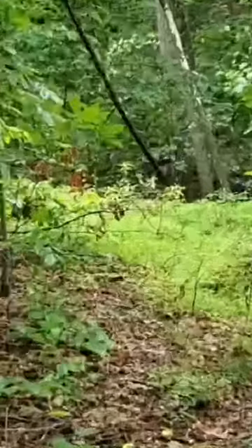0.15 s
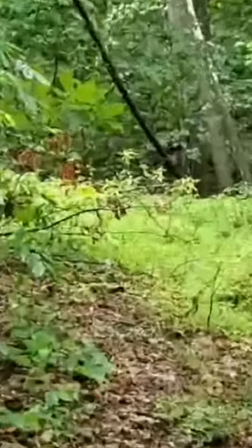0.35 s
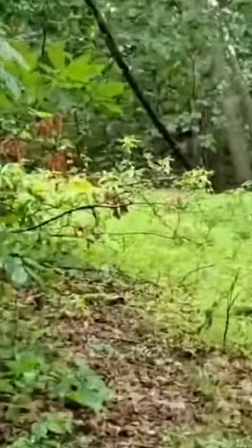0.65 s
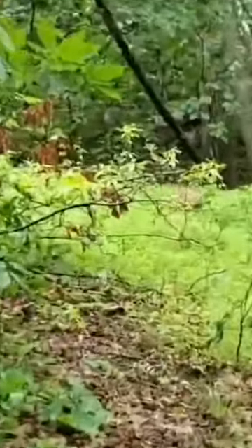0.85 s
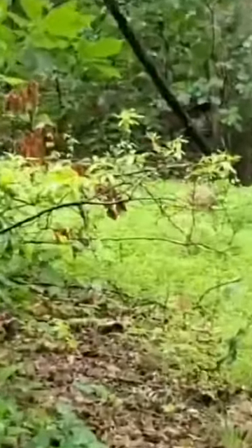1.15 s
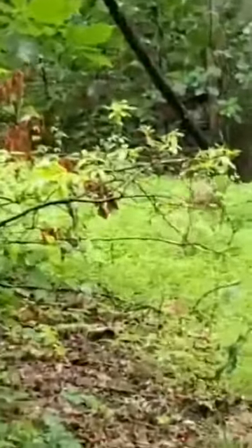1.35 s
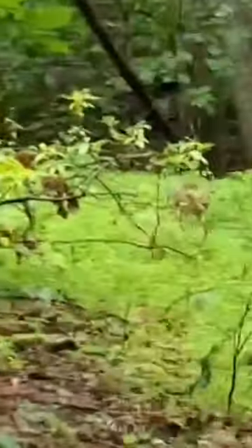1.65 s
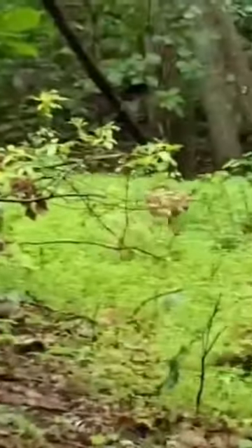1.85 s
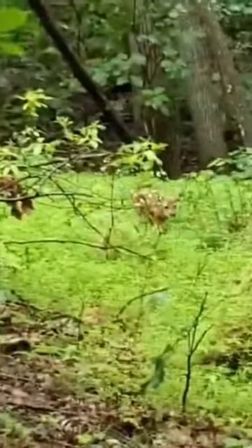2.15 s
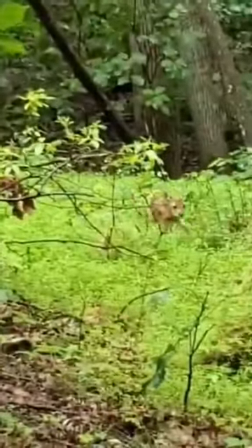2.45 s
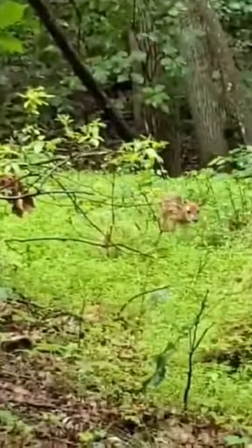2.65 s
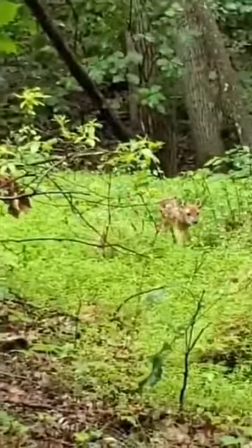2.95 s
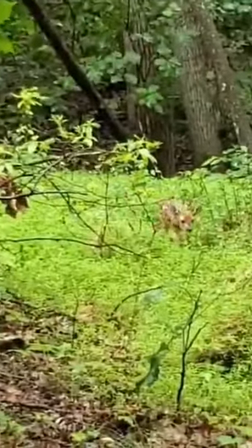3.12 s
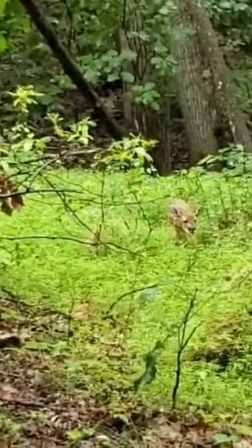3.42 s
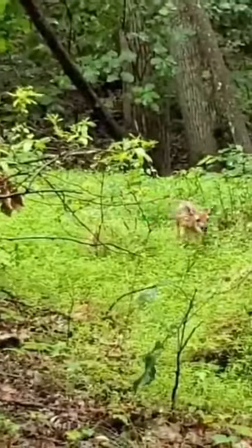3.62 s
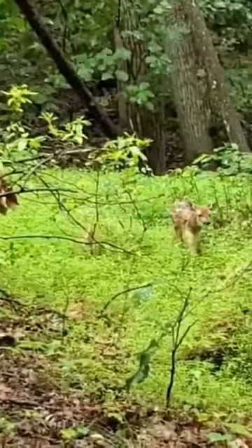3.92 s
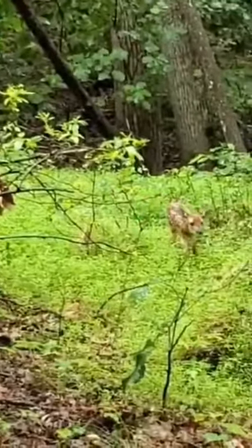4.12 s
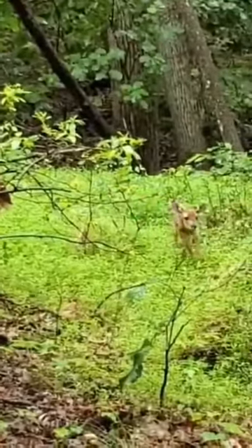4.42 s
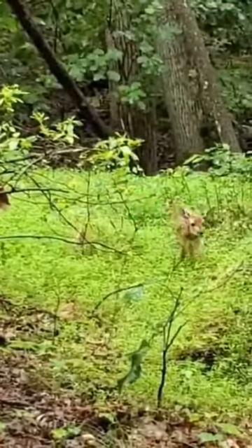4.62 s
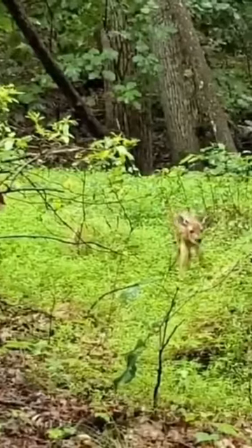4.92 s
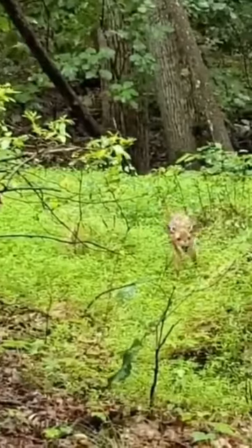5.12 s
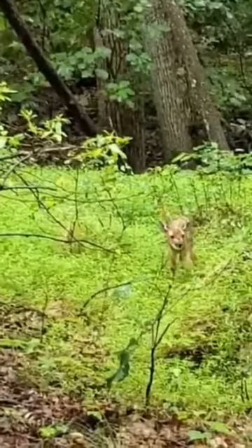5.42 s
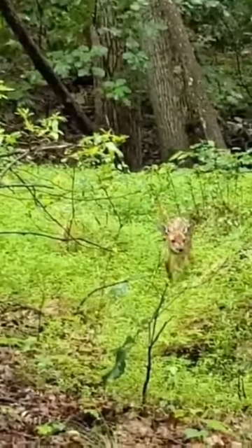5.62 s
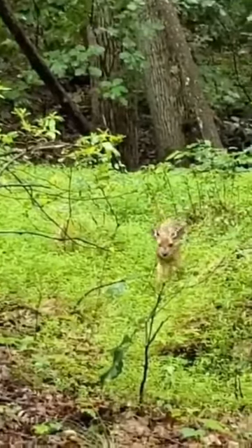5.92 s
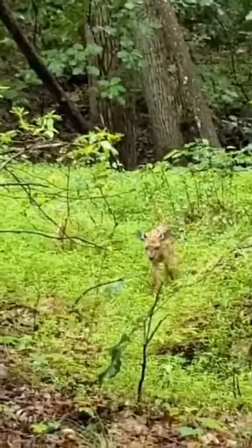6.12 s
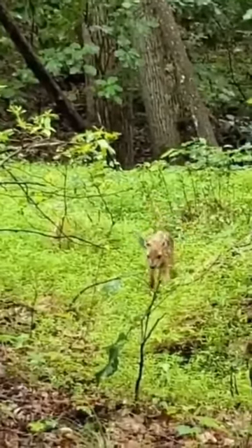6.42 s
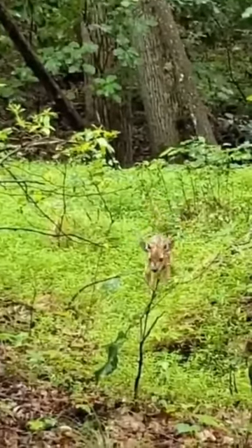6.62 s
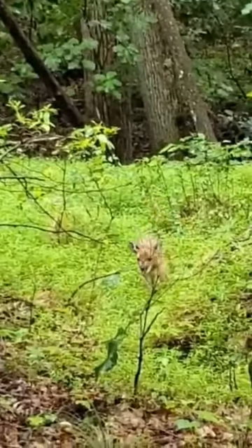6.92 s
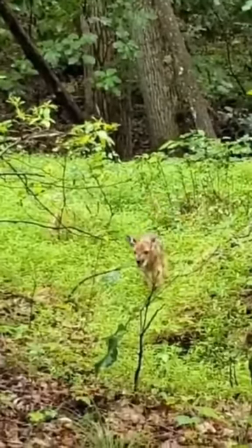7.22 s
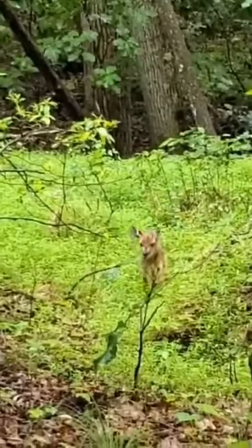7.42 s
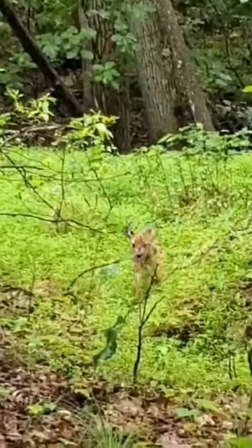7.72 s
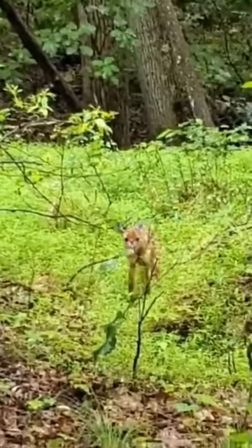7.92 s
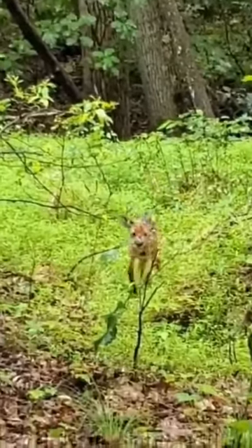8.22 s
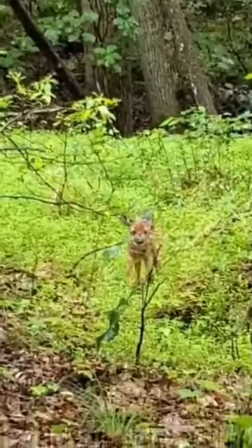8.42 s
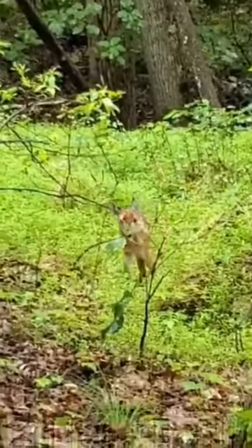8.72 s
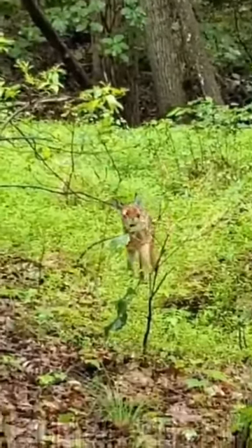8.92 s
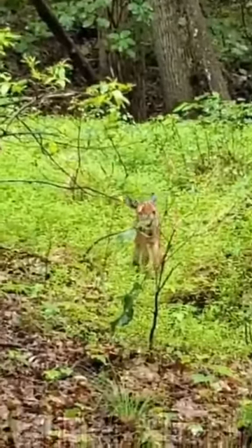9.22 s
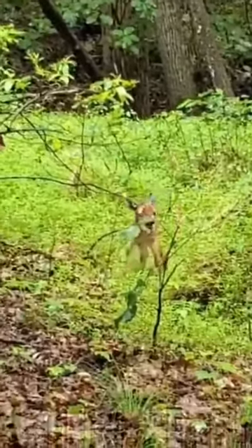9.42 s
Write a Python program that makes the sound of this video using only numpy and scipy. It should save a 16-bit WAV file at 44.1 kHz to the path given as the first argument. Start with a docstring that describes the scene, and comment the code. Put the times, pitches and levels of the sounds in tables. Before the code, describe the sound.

Harsh, high fawn bleats repeat every couple of seconds among echoing trees, with faint leaf crackles, hand bumps and steady hiss.

```python
"""Fawn calling in a wood

A fawn gives five nasal bleats, the last the strongest. Each is a train of sharp pulses from the vocal folds,
bent into an arch of pitch and rung by throat, nose and mouth. Trunks and leaves scatter it into a haze and a tail.
Crackles and rustles of dry leaves, rumble and bumps of the hand-held microphone and the hiss of foliage
are shaped noise; a far bird is a gliding tone. A compressor holds the bleats down."""
import sys
import numpy as np
from scipy import signal
from scipy.fft import rfft, irfft
from scipy.io import wavfile
from scipy.ndimage import uniform_filter1d

SR = 44100
rng = np.random.default_rng(int(sys.argv[2]) if len(sys.argv) > 2 else 0)


def digitize_waveform(pressure):
    """Quantize a signal to 16-bit integers and store it at the path in sys.argv[1].

    Rows of a 2-D input are taken as channels; values are limited to [-1, 1].
    """
    field = np.atleast_2d(pressure).T
    bounded = np.clip(field, -1, 1)
    quanta = np.round(bounded * 32767).astype(np.int16)
    wavfile.write(sys.argv[1], SR, quanta)


N = 421596
EDGE_HZ = 13150  # upper limit of the whole sound

# The bleats. Each row: start in seconds, length in seconds, effort in relative dB, ceiling of the pitch in Hz,
# scoop time in seconds, crest time in seconds, sag in Hz, last drop in Hz, fade in dB,
# nose level in relative dB, mouth level in relative dB, throat tuning as a ratio.
BLEAT_CALLS = [ (1.46, 0.47, -13, 571.4, 0.051, .184, 128, 248.3, -13, 2, -6, 1.02),
               (3.225, 0.47, -12.5, 566.2, 0.04, 0.22, 133, 273, -11, -0.5, -6.5, 1.025),
               (4.984, 0.48, -13, 561.3, .040, 0.17, 216, 194.2, -15.5, -3.5, -6, 1.03),
               (6.762, .555, -13, 558.3, .044, .182, 161, 75.2, -11, -3, -9, 1.012),
               (9.209, 0.57, -6.5, 567.6, .033, 0.21, 184, 80, -29, -2.5, -6, 1.028), ]
# Upper resonances of the throat. Each row: Hz before tuning, width in Hz, relative level in dB.
THROAT_RINGS = [(2975, 520, 0.5), (4156, 890, -1), (4890, 250, -1.5), (5525, 1130, -1.5), (6410, 940, -7.5),
                (10070, 10700, -26.5), (12100, 1800, -17)]
# Low resonances of the mouth. Each row: Hz, width in Hz, relative level in dB.
MOUTH_RINGS = [(560, 540, -46), (1487, 374, 7.5), (2300, 1100, 6)]
# Scatter from near trunks and leaves. Each row: Hz, level in dB against the direct sound.
NEAR_SCATTER = [(500, 1), (1600, -7), (2600, -12.5), (3600, 7), (6000, -1), (13000, 2.5)]
# Tail of the deep wood. Each row: Hz, level in dB against the direct sound.
WOOD_TAIL = [(500, 8.5), (1600, -16), (3300, -12), (4500, -9), (6000, -14.5), (13000, -16)]
# How long that tail lasts. Each row: Hz, time in seconds to die by 60 dB.
WOOD_TAIL_T60 = [(1000, 1.3), (3300, 1.094), (7000, 0.76), (13000, 0.89)]
# Left-right balance of the fawn. Each row: Hz, left minus right in dB.
PORT_BALANCE = [(1200, 1.5), (2500, -6), (4500, 5), (13000, 4.5)]
# The fawn reaches the left port first. Each row: Hz, lead in radians.
LEFT_LEAD = [(1500, 0), (2800, 1.8), (4050, 3), (7400, 5.5), (13000, 9.3)]
# Dry leaves and twigs crackling underfoot.
# Each row: time in seconds, relative peak in dB, centre in Hz, left minus right in dB.
LEAF_CRACKLES = [(0.756, -42, 2290, -3), (1.093, -36, 4540, 3), (1.224, -37.5, 3000, -2),
                 (1.306, -35.5, 3780, 1), (1.334, -31.5, 2430, 0), (1.416, -35, 3940, 3),
                 (3.222, -32.5, 2450, -2), (4.364, -38.5, 2340, 5), (4.404, -41, 3820, 2),
                 (4.459, -40, 5000, 3), (4.558, -37.5, 5100, 4), (4.655, -41, 2630, 9),
                 (5.828, -37, 2180, 0), (6.11, -41, 3500, 0), (6.146, -40.5, 856, 2), (6.563, -39, 2520, 1),
                 (6.707, -37.5, 2570, 0), (8.895, -33.5, 2280, 1), (8.942, -38.5, 2740, 3),
                 (8.956, -42, 2760, 12), (9.016, -41, 3770, 4), (9.086, -41.5, 2360, 5)]
# How busily the leaf litter rustles. Each row: time in seconds, relative level in dB.
LITTER_RUSTLE = [(0, -59), (.8, -50.5), (2.2, -52.5), (3.1, -61), (5.8, -111), (6.4, -57), (7.8, -60),
                 (8.7, -84), (9.1, -59)]
# Colour of the microphone rumble. Each row: Hz, relative density in dB per Hz.
RUMBLE_COLOUR = [(15, -30), (35, -3), (60, 7), (85, -4), (125, -14), (200, -23), (400, -23), (900, -67)]
# Rise and fall of the rumble. Each row: time in seconds, relative level in dB.
RUMBLE_COURSE = [(0, -72), (1.1, -67.5), (1.45, -54), (1.85, -49.5), (2.1, -62), (2.5, -56.5), (2.85, -69),
                 (3.35, -61.5), (3.65, -42), (3.9, -57), (4.2, -47.5), (4.9, -68), (5.35, -50), (5.9, -77),
                 (6.3, -58.5), (7.1, -56), (7.9, -65.5), (9.56, -64)]
# Bumps of the hand. Each row: time in seconds, swing in relative dB, dull knock in relative dB.
HAND_BUMPS = [(0.092, -57, -76), (1.544, -33.5, -47), (1.754, -39, -45), (1.809, -59, -40),
              (2.085, -63, -70), (2.22, -48, -70), (3.469, -51, -51), (3.768, -49, -48.5), (3.99, -37, -64),
              (4.171, -32.5, -59), (4.221, -32, -68), (5.381, -56, -63), (6.309, -40.5, -72),
              (6.841, -46, -53), (8.1, -44.5, -68), (8.86, -45, -72), (9.066, -33, -68)]
# A far bird's whistle. Each row: time in seconds, pitch in Hz, relative level in dB.
BIRD_WHISTLE = [(7.56, 2200, -50), (7.62, 2293, -62), (7.669, 2390, -47), (7.709, 2376, -69)]
# Colour of the foliage hiss. Each row: Hz, relative density in dB per Hz.
LEAF_COLOUR = [(76, -36), (130, -7), (207, -13), (355, -9), (423, -11), (750, -5), (1400, -6), (2460, -1),
               (2870, -3), (6460, -9), (8300, -19.5), (12200, -24), (13200, -28)]
# Rise and fall of the hiss. Each row: time in seconds, relative level in dB.
LEAF_COURSE = [(0, -10.2), (.5, -4), (1.2, 0), (2.7, -1.94), (4.4, -2.2), (6.2, -2.65), (8.1, -5.5),
               (9.56, -2)]
# How alike the hiss is on left and right. Each row: Hz, likeness from 0 to 1.
LEAF_LIKENESS = [(60, 0.67), (180, 0.94), (520, 0.52), (1530, 0.6), (4520, 0.15), (13300, 0.12)]


def fawn(earlier_start_s=-0.5, earlier_db=3):
    """All the bleats, scattered by the wood and heard a little differently by the two ports."""
    # a second of lead-in holds an earlier bleat, like the third, whose echoes hang on at the opening
    voice = np.zeros(SR + N)
    for start, *shape in BLEAT_CALLS:
        add(voice, 1 + start, bleat(*shape))
    add(voice, 1 + earlier_start_s, gain_of(earlier_db) * bleat(*BLEAT_CALLS[2][1:]))
    hz, _, z = signal.stft(wood(voice), SR, nperseg=512)
    # each port takes half of the level and phase difference
    lean_db = read(PORT_BALANCE, hz)[:, None] / 2
    lead = read(LEFT_LEAD, hz)[:, None] / 2
    z = z * np.exp(1j * np.array([lead, -lead]))
    z = z * gain_of(np.array([lean_db, -lean_db]))
    return signal.istft(z, SR, nperseg=512)[1][:, SR:SR + N]


def bleat(length, effort_db, top_hz, scoop_s, crest_s, sag_hz, drop_hz, fade_db, nose_db, mouth_db, tuning):
    """Air pulses from the vocal folds ring throat, nose and mouth; effort alone sets how loud they are."""
    t = np.arange(0, length, 1 / SR)
    hz = arch(t, length, top_hz, scoop_s, crest_s, sag_hz, drop_hz)
    drive = vocal_folds(hz)
    # the mouth grows as it opens, while the nose wavers
    late = t / length - .5
    nasal_db = nose_db - 0.5 * late + 6 * wander(len(t), 5.6)
    nose = gain_of(nasal_db) * evened(cavity(drive, [(3359, 483, 0)]))  # one narrow ring: Hz, width in Hz, dB
    mouth = gain_of(mouth_db + 8 * late) * evened(cavity(drive, MOUTH_RINGS))
    tuned_rings = [(f * tuning, width, db) for f, width, db in THROAT_RINGS]
    voice = evened(cavity(drive, tuned_rings)) + nose + mouth
    # level the voice out, so that only effort shapes its loudness
    power = uniform_filter1d(uniform_filter1d(voice ** 2, size=900), size=700)
    steady = voice / np.sqrt(power + 1e-9)
    return gain_of(effort_db + effort(t, length, fade_db)) * steady * signal.windows.tukey(len(t), .025)


def vocal_folds(hz):
    """Sharp pulses, clean when the folds are taut, uneven in time and strength when they are slack."""
    slack_hz, jitter, shimmer_db = 490, .04, 4.5  # the folds slacken below this pitch
    small_head_hz = 1100  # so small a head radiates little below this
    slack = np.clip(2 * (1 - hz / slack_hz), 0, 1)
    turns = np.cumsum(hz * (1 + jitter * slack * wander(len(hz), 163))) / SR
    # many cosines in step add up to one sharp pulse per turn; each fades out at the upper limit
    folds = np.zeros(len(hz))
    for k in np.arange(1, EDGE_HZ // 220):
        folds += np.cos(2 * np.pi * k * turns) * np.clip((EDGE_HZ - k * hz) / hz + 1, 0, 1)
    # one random strength per cycle
    strength = rng.standard_normal(SR // 100)[np.round(turns).astype(int)]
    shimmer = gain_of(shimmer_db * slack * strength)
    thin = signal.butter(2, small_head_hz, "high", fs=SR, output="sos")
    return signal.sosfilt(thin, evened(folds * np.sqrt(hz)) * shimmer)


def arch(t, length, top_hz, scoop_s, crest_s, sag_hz, drop_hz):
    """The folds tighten in a quick scoop, settle on a crest, sag as air runs out and let go at the end."""
    scoop_hz, settle_hz, settle_power = 128, 165.5, 3.7
    drop_s, lowest_hz = .024, 283.6  # the slackest pitch
    scoop = scoop_hz * np.exp(-(t / scoop_s) ** 2)
    settle = settle_hz * np.maximum(1 - t / crest_s, 0) ** settle_power
    sag = sag_hz * (np.maximum(t - crest_s, 0) / (length - crest_s)) ** 2
    drop = drop_hz * np.exp((t - length) / drop_s)
    return np.maximum(top_hz - scoop - settle - sag - drop, lowest_hz)


def effort(t, length, fade_db):
    """The force behind a bleat in dB: a swell, a slow fade, a release and a small waver."""
    swell = -34.5 * np.exp(-t / 0.054)
    fade = fade_db * (t / length) ** 2
    release = -7.5 * np.exp((t - length) / 0.13)
    return swell + fade + release + 1.5 * wander(len(t), 5.6)


def cavity(x, modes, size=4096):
    """Rings x through steep-sided resonances, with no sound ahead of its cause."""
    f = np.fft.rfftfreq(size, 1 / SR)
    power = sum(gain_of(db) ** 2 / (1 + ((f - hz) / width) ** 2 * 2) ** 4 for hz, width, db in modes)
    log_gain = np.log(power + 1e-9) / 2
    # a minimum-phase filter: its phase follows from its gain
    causal = np.exp(np.conj(signal.hilbert(np.r_[log_gain, log_gain[-2:0:-1]])))
    return signal.oaconvolve(x, np.fft.ifft(causal).real[:size // 2])[:len(x)]


def wood(x, scatter_t60=0.23):
    """Direct sound, with short scatter off near trunks and leaves and the long tail of the deep wood."""
    response = echoes(NEAR_SCATTER, [(1000, scatter_t60)]) + echoes(WOOD_TAIL, WOOD_TAIL_T60)
    response[:, 0] += 1  # the direct sound
    return signal.fftconvolve(np.atleast_2d(x), response, axes=1)[:, :x.shape[-1]]


def echoes(colour, t60, size=SR):
    """Sparse reflections of random sign for each ear, every band dying at its own speed."""
    taps = rng.choice([-1., 1.], (2, size)) * (rng.random((2, size)) < 4000 / SR)  # 4000 a second
    taps[:, :SR // 400] = 0  # none in the first 2.5 ms
    hz, t, z = signal.stft(evened(taps), SR, nperseg=256)
    life = read(t60, hz)[:, None]
    even_energy = np.sqrt(2 * np.log(1000) / (life * SR))  # long and short tails carry equal energy
    z *= gain_of(read(colour, hz)[:, None] - 60 * t / life) * even_energy
    return signal.istft(z, SR, nperseg=256)[1]


def litter(snap_s=0.0022, octaves=1.17, dull_hz=9000, rustle_db=-3, far_db=-14):
    """Dry leaves close by: each crackle is a clump of tiny fractures; smaller ones rustle at random."""
    crackles, t = np.zeros((2, N)), np.arange(2048) / SR
    f = np.fft.rfftfreq(len(t), 1 / SR) + 1
    for s, db, hz, pan in LEAF_CRACKLES:
        fractures = rng.choice([-1, 1], (2, len(t))) * t * np.exp(-2 * t / snap_s)
        around_centre = 1 / (1 + abs(np.log2(f / hz) / octaves) ** 3)
        snap = irfft(rfft(fractures) * around_centre / np.hypot(1, (f / dull_hz) ** 3))
        snap /= abs(snap.mean(0)).max()
        add(crackles, s, snap * gain_of(db + np.array([[pan], [-pan]]) / 2))
    # about 220 small fractures a second, of random strength, each dying in a few milliseconds
    grains = (rng.random(N) < 220 / SR) * gain_of(3.5 * np.minimum(rng.exponential(1, N), 3))
    bursts = signal.lfilter([1], [1, -np.exp(-1 / (0.0053 * SR))], grains)
    leaf = signal.butter(2, [1400, 6000], "band", fs=SR, output="sos")
    rustle = signal.sosfilt(leaf, bursts * rng.standard_normal((2, N)))
    db, = follow(LITTER_RUSTLE, np.arange(N) / SR)
    near = crackles + gain_of(db + rustle_db) * evened(rustle)
    far = signal.fftconvolve(near, echoes([(1000, 0)], [(1000, .3)]), axes=1)[:, :N]
    return near + gain_of(far_db) * far


def handling(level_db=1, body_hz=61, ring_s=0.0074, knock_s=0.0023):
    """A low rumble from the hand, with soft bumps that knock and swing the microphone's body."""
    db, = follow(RUMBLE_COURSE, np.arange(N) / SR)
    out = gain_of(db + level_db) * air(RUMBLE_COLOUR, [(60, 0.33)], patchy_db=4.0)
    t = np.arange(SR // 5) / SR
    dull = signal.butter(2, [130, 560], "band", fs=SR, output="sos")
    swing_shape = t / ring_s * np.exp(1 - t / ring_s)
    knock_shape = t / knock_s * np.exp(1 - t / knock_s)
    for s, swing_db, knock_db in HAND_BUMPS:
        swing = np.sin(2 * np.pi * (body_hz * t + 0.79 * rng.random((2, 1))))
        knock = evened(signal.sosfilt(dull, rng.standard_normal((2, len(t)))))
        add(out, s, gain_of(swing_db) * swing_shape * swing)
        add(out, s, gain_of(knock_db) * knock_shape * knock)
    return out * gain_of([[-1.3], [1.3]])  # a little stronger on the right


def bird(level_db=8, ring_s=1.0):
    """A gliding whistle from far off, heard only through its echoes."""
    t = np.arange(BIRD_WHISTLE[0][0], BIRD_WHISTLE[-1][0], 1 / SR)
    hz, db = follow(BIRD_WHISTLE, t)
    tone = np.sin(2 * np.pi * np.cumsum(hz) / SR)
    whistle = gain_of(db + level_db) * tone * signal.windows.tukey(len(t), .2)
    out = np.zeros((2, N))
    add(out, t[0], signal.fftconvolve(whistle[None], echoes([(2300, 0.0052)], [(2300, ring_s)]), axes=1))
    return out * gain_of([[-3], [2]])


def foliage(level_db=-49, lead_s=0.000418):
    """The hiss of many leaves, swelling a little and coming mostly from the left."""
    db, = follow(LEAF_COURSE, np.arange(N) / SR)
    return gain_of(level_db + db) * air(LEAF_COLOUR, LEAF_LIKENESS, patchy_db=0.9, lead_s=lead_s)


def air(spectrum, likeness, patchy_db, lead_s=0, around_hz=1410):
    """Stereo noise of a given colour with drifting patches; rms 1."""
    frames, hz = N // 512 + 5, np.fft.rfftfreq(2048, 1 / SR)
    a, b, c, d, patches = rng.standard_normal((5, frames, len(hz))).transpose(0, 2, 1)
    patches = uniform_filter1d(uniform_filter1d(evened(patches), size=30, axis=0), size=8, axis=1)
    patches = evened(patches)
    same = np.clip(read(likeness, hz), -1, 1)[:, None]
    left, other = a + 1j * b, c + 1j * d
    # the right port hears the shared part later; well below around_hz the delay vanishes
    delay_s = lead_s * hz ** 4 / (hz ** 4 + around_hz ** 4)
    later = np.exp(-2j * np.pi * hz * delay_s)[:, None]
    z = np.array([left, same * later * left + np.sqrt(1 - same ** 2) * other])
    z *= gain_of(read(spectrum, hz)[:, None] + patchy_db * patches)
    return evened(signal.istft(z, nperseg=2048, noverlap=1536)[1][:, :N])


def gain_of(db):
    """Turns decibels into a factor of amplitude."""
    return 10 ** (np.asarray(db) / 20)


def evened(x):
    """Scales a sound to rms 1."""
    return x / np.sqrt(np.mean(x ** 2) + 1e-20)


def read(points, hz):
    """Reads a table over pitch on a logarithmic axis."""
    f, value = np.transpose(points)
    return np.interp(np.log(hz + 1), np.log(f + 1), value)


def follow(rows, t):
    """Reads the columns of a table over time at the times t."""
    s, *columns = np.transpose(rows)
    return [np.interp(t, s, c) for c in columns]


def add(mix, s, sound):
    """Mixes a sound in at s seconds."""
    part = mix[..., max(round(s * SR), 0):][..., :sound.shape[-1]]
    part += sound[..., :part.shape[-1]]


def wander(size, rate_hz):
    """Smooth random motion, mostly slower than rate_hz, scaled to rms 1 over a second."""
    f = np.fft.rfftfreq(SR, 1 / SR)
    return evened(irfft(rfft(rng.standard_normal(SR)) / (1 + (f / rate_hz) ** 2)))[:size]


def scene():
    """The fawn, the leaves underfoot, the hand on the microphone, the bird and the foliage."""
    return fawn() + litter() + handling() + bird() + foliage()


def record(dry, split_hz=1950, threshold_db=-33, squeeze=0.44):
    """A quick compressor takes a share off loud treble, ducking hiss and echoes too; then the upper limit."""
    f = np.fft.rfftfreq(2 * N, 1 / SR)
    low = irfft(rfft(dry, 2 * N) / (1 + (f / split_hz) ** 4))[:, :N]
    high = dry - low
    power = uniform_filter1d(uniform_filter1d((high ** 2).mean(0), size=900), size=600)
    over_db = np.maximum(10 * np.log10(abs(power) + 1e-12) - threshold_db, 0)
    held = low + high * gain_of(-squeeze * over_db)
    upper_limit = signal.firwin(511, EDGE_HZ, window=("kaiser", 9), fs=SR)
    return signal.oaconvolve(held, upper_limit[None], "same")


dry = scene()
out = record(dry)
digitize_waveform(out)
```